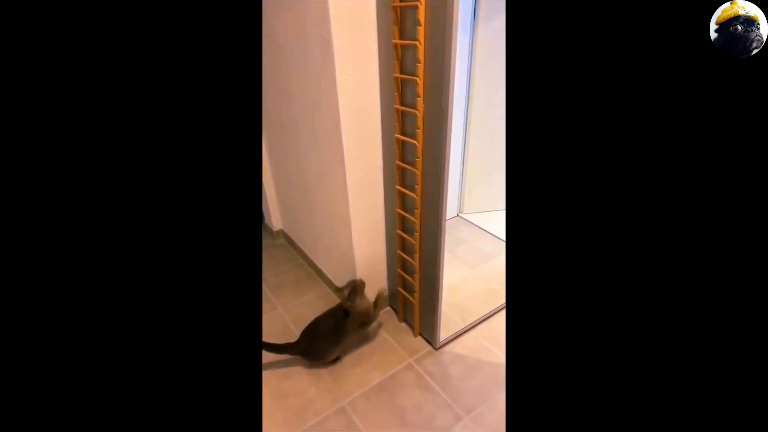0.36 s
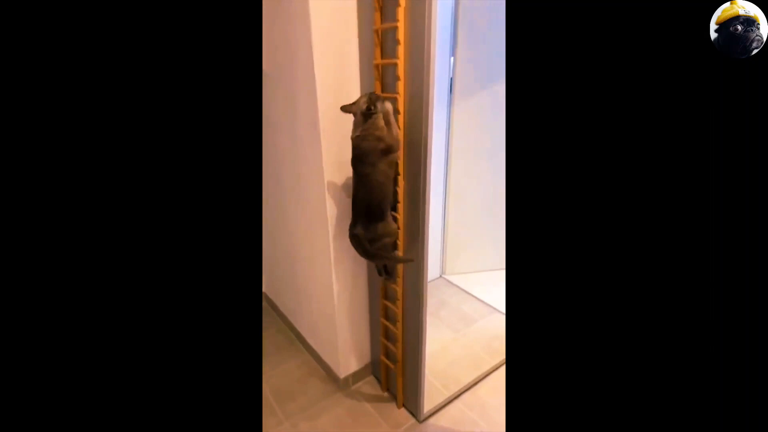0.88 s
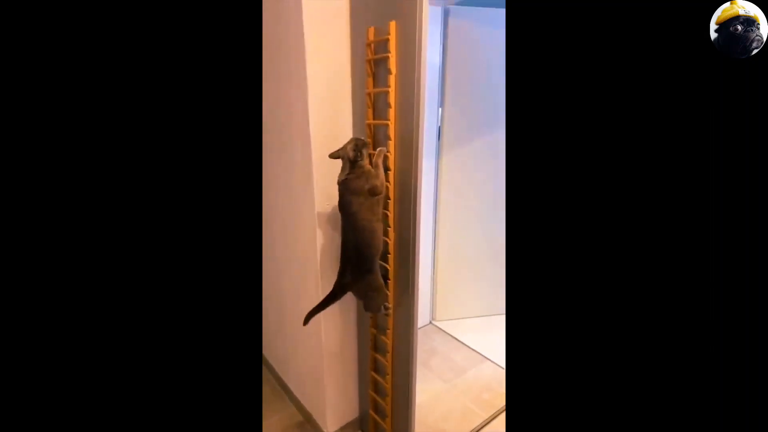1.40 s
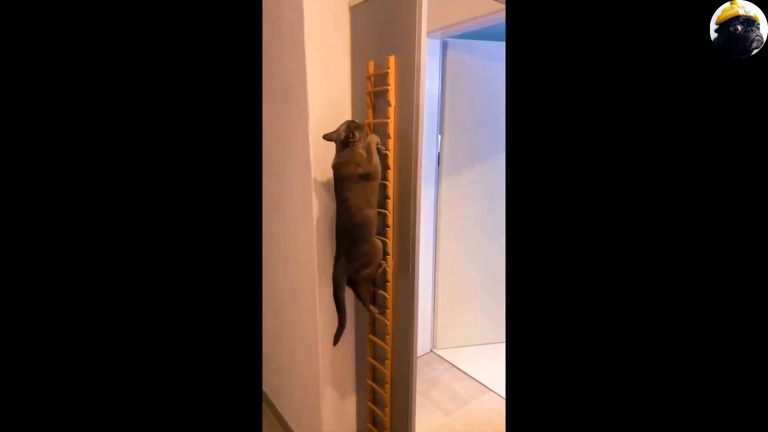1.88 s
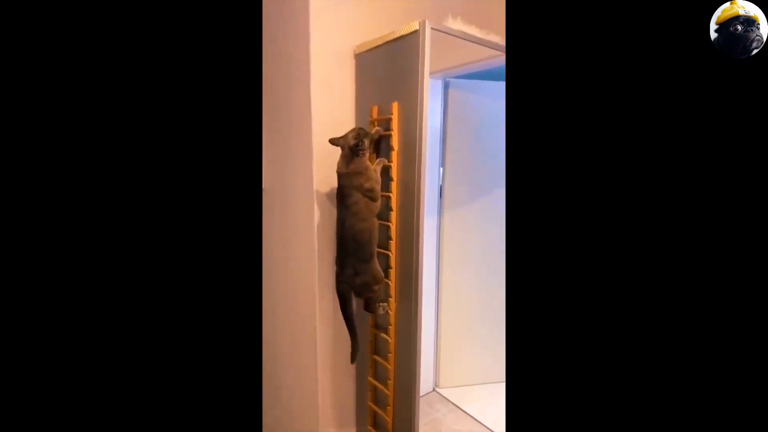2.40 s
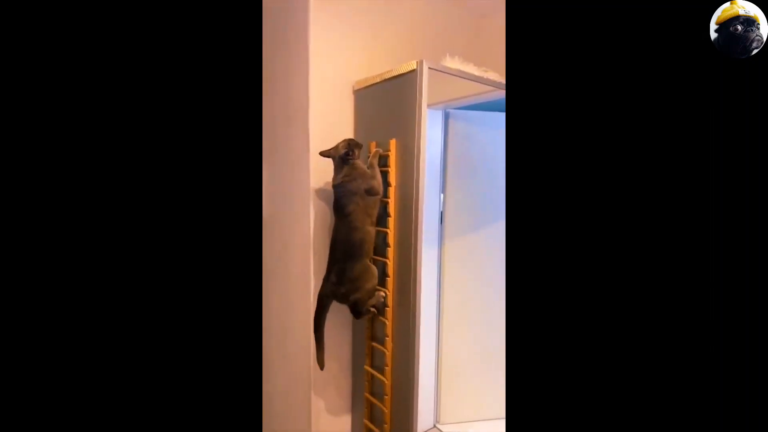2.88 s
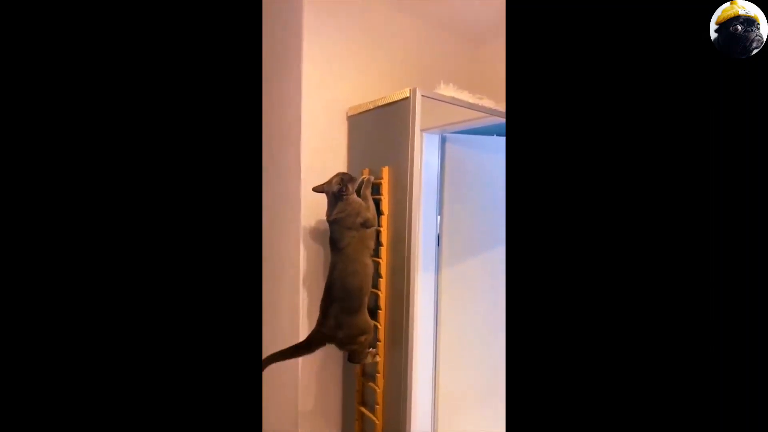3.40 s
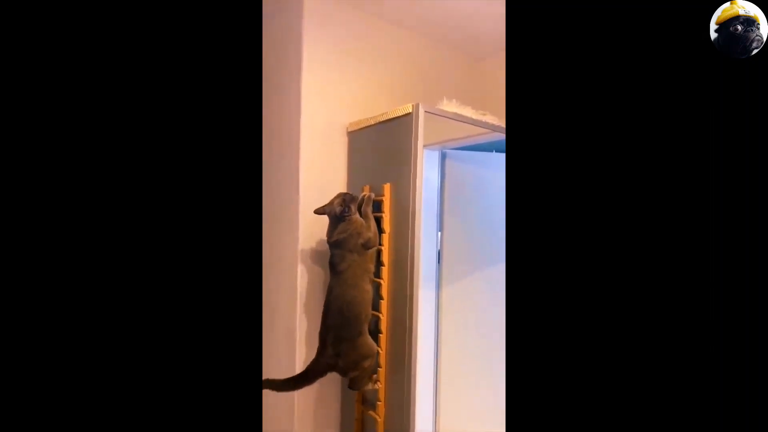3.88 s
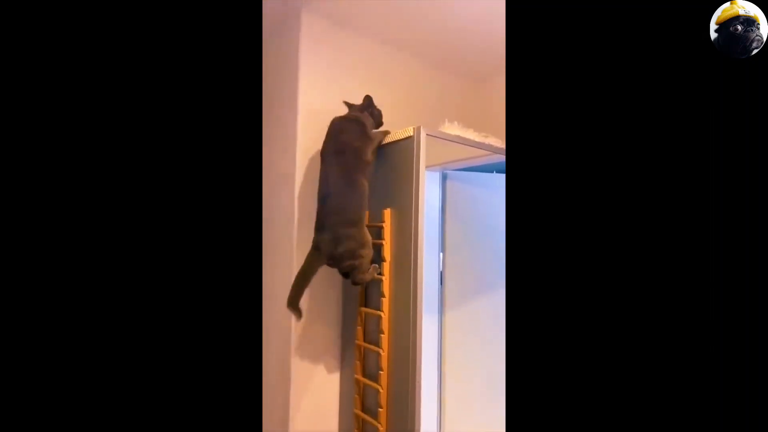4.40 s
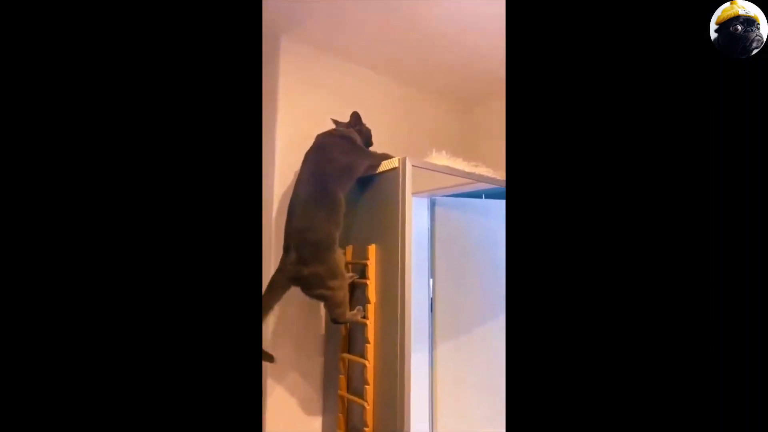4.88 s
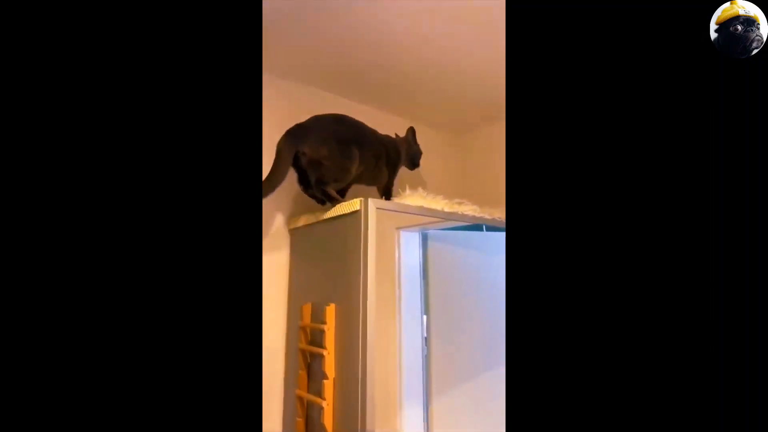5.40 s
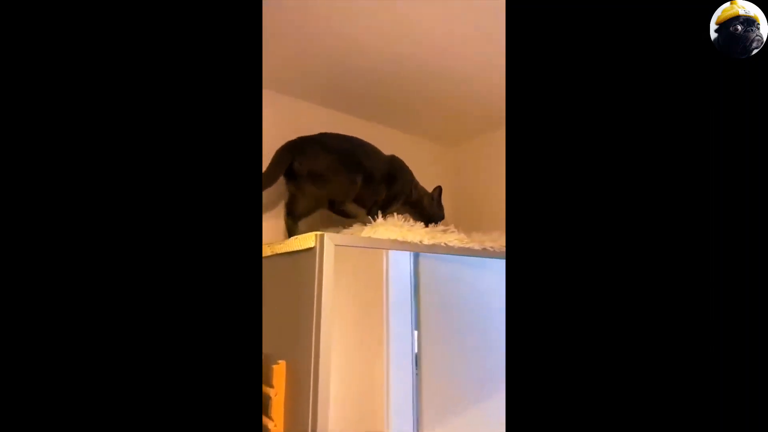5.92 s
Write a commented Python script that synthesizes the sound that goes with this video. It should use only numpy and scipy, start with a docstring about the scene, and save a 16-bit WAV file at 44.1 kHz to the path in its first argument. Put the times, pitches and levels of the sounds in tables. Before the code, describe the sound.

Sharp claw clacks, short scratchy skids and dull hollow knocks climb in uneven clusters, beginning with a loud leap, over faint air noise and low hum.

```python
"""A faint rush of air is heard first: soft noise, strongest in the bass, swelling until 1.7 s, then drifting.
A cat then climbs a wooden ladder fixed to the side of a tall cabinet in a tiled room.
Its claws strike and drag on the rungs: noisy contact forces excite damped modes of the wood.
Its weight thumps the hollow cabinet, exciting panel and air modes; decaying echoes form the room.
A low hum, a sine and its octave, fades in as the microphone tilts up."""
import sys
import numpy as np
from scipy import signal
from scipy.fft import rfft, irfft
from scipy.io import wavfile
from scipy.ndimage import uniform_filter1d

SR = 44100
rng = np.random.default_rng(int(sys.argv[2]) if len(sys.argv) > 2 else 0)


def to_wav(sig):
    """Store sig (one row per channel, or 1-D mono) as 16-bit WAV at the path in sys.argv[1].

    Samples outside -1..1 are clipped; the rate is SR.
    """
    pcm = np.clip(np.atleast_2d(sig), -1, 1) * 32767
    pcm = np.round(pcm).astype(np.int16)
    wavfile.write(sys.argv[1], SR, pcm.T)  # frames by channels


def to_linear_factor(level_db):
    """Convert decibel levels (scalar or array-like) to linear amplitude factors."""
    exponent = np.asarray(level_db, float) / 20
    return 10 ** exponent


N = 265790

# Spectrum of the rush of air: (frequency [Hz], relative density [dB])
AIR_SPECTRUM = [(30, 8), (60, 16), (110, 5), (200, 7), (450, 2), (800, -6), (2000, -8.5), (4000, -13),
                (8000, -20), (15500, -28.5)]
# Strength of the air noise: (time [s], level [dB])
AIR_LEVEL = [(0, -61), (.6, -58.5), (1.7, -49), (3, -53.5), (3.85, -55), (5.7, -54), (6.03, -59.5)]
# Strength of the hum's fundamental: (time [s], level [dB])
HUM_LEVEL = [(0, -87), (1.5, -50.5), (2.6, -56), (3.8, -52), (5, -45.5), (6.03, -51.5)]
# Reverberation time of the room: (frequency [Hz], 60 dB decay time [s])
ROOM_T60 = [(100, 0.64), (400, 0.53), (1500, 0.47), (4000, 0.52), (8000, 0.26), (14000, 0.32)]
# Strength of the echoes: (frequency [Hz], relative level [dB])
ECHO_LEVEL = [(60, -16), (100, -1), (400, -5.5), (1500, -4.5), (4000, -8.5), (8000, -3), (14000, -15.5)]
# Stereo difference before local offsets: (frequency [Hz], side level re mid [dB])
SIDE_LEVEL = [(60, -41), (200, -60), (380, -27), (700, -3), (1300, -19), (2400, -11.5), (4400, -4),
              (8000, -7), (12000, -19.5), (15500, -3.5)]
# Cabinet panel modes: (frequency [Hz], relative level [dB], 60 dB decay time [s])
PANEL_MODES = [(183, -13.5, 0.14), (215, -21, .12), (256, -5.5, 0.27), (312, 3, 0.04), (401, 8.5, 0.031),
               (414, -11, 0.07), (457, -10, 0.024), (509, -3, 0.051)]
# Modes of the air in the cabinet: (frequency [Hz], relative level [dB], 60 dB decay time [s])
CAVITY_MODES = [(54, -18, 0.16), (75, 9, 0.17), (105, 11.5, 0.079), (120, 24.5, 0.35), (140, -20.5, .25)]
# Ladder rail modes: (frequency [Hz], relative level [dB], 60 dB decay time [s])
RAIL_MODES = [(520, 0, .04), (600, -3, .04), (730, -4, .03), (890, -3, .03), (1100, -2, .03),
              (1190, 0, .05), (1400, -2, .03)]
# Ladder rung modes: (frequency [Hz], relative level [dB], 60 dB decay time [s])
RUNG_MODES = [(1630, -4, .025), (1880, -4, .025), (2090, -2, .025), (2300, 0, .025), (2530, 0, .025),
              (2760, 0, .025), (3050, -2, .025), (3250, -3, .02), (3500, -2, .02), (3800, -4, .02),
              (4200, -4, .02), (4600, -5, .015), (5000, -5, .015), (5900, -6, .012)]
# Weight landing on the cabinet:
# (time [s], ring level [dB], ring centre [Hz], deep part re ring [dB], deep centre [Hz])
THUMPS = [(0.653, -27, 180, -8, 76), (0.711, -18, 549, -24.5, 72), (0.77, -20, 500, -28.5, 118),
          (0.797, -7.5, 190, -35, 116.3), (0.893, -6.5, 183, -6.5, 103.3), (0.926, -19.5, 365, -4, 105.3),
          (1.125, -52, 360, -5, 86.1), (1.277, -28.5, 297.6, -2.5, 96), (1.337, -35.5, 294, -16.5, 106),
          (1.411, -45, 320, 12, 114), (1.494, -28, 248, -9, 107), (1.729, -30, 252, -19.5, 117.2),
          (1.888, -32.5, 307.6, 0, 89.5), (2.183, -26.5, 252, -13, 116.4), (2.206, -32.5, 258, 1.5, 101.5),
          (2.371, -31.5, 560, -26.5, 98), (2.638, -23, 252, -13.5, 105), (2.839, -33.5, 387, -5, 65),
          (3.046, -26.5, 256, -21, 121), (3.091, -22, 322, -25, 121), (3.149, -30, 323, -25, 119),
          (3.193, -30.5, 405.5, -13, 99), (3.471, -27, 323, -11, 120), (3.655, -34.5, 269.8, -31, 120.5),
          (3.999, -35, 296, 3.5, 109), (4.104, -21.5, 421, -32.5, 110), (4.209, -21.5, 386.4, -10.5, 70.0),
          (4.349, -33, 429, 4, 75), (4.466, -22.5, 274, -6, 115.4), (4.654, -11.5, 300, -3, 102.7),
          (4.68, -20.5, 149, 11, 70.4), (4.862, -28.5, 370, -36.5, 117.5), (5.007, -26.5, 263, -13, 123),
          (5.225, -31.5, 505.6, -18, 120), (5.28, -28.5, 336, -31, 121), (5.333, -28, 321.3, -5, 70.9),
          (5.458, -26.5, 345, 0, 84.4)]
# Claws dragging over wood: (time [s], ring level [dB], ring centre [Hz], hiss re ring [dB])
DRAGS = [(0.7813, -16, 2300, -55), (0.8385, -28, 2610, 8), (0.915, -22.5, 2500, 5.5),
         (0.9707, -26, 2277, 20), (0.9872, -16.5, 2420, -15), (1.002, -31, 1190, 6),
         (1.0244, -32.5, 2670, -4), (1.326, -48.5, 2070, -8), (1.4918, -25.5, 4160, -1.5),
         (1.5245, -29, 2820, 3.5), (1.746, -31, 2870, 1.5), (1.93, -37.5, 2970, 4.5),
         (1.985, -39, 1270, -15.5), (2.165, -21.5, 2430, -6.5), (2.2076, -27, 1950, -24),
         (2.242, -35, 2620, -6), (2.4656, -29.5, 2588, 11), (2.846, -45, 2100, -4),
         (3.0686, -34, 1890, 7.5), (3.091, -32, 2370, -18), (3.1086, -33, 2570, 1),
         (3.147, -25.5, 2870, -13), (3.191, -28, 2720, -13), (3.4142, -38.5, 3020, -44),
         (3.993, -41, 3030, -3), (4.2505, -36.5, 2424, 2), (4.351, -24.5, 2630, 5),
         (4.4825, -28.5, 2860, 5.5), (4.663, -35, 2690, -9.5), (4.846, -25.5, 3000, 1),
         (5.01, -27, 3400, 3), (5.0744, -24, 2670, 4.5), (5.3529, -31.5, 2870, 9.5),
         (5.8232, -62.5, 3600, 14), (5.9153, -72, 3710, 21.5)]
# Claws hitting rungs:
# (time [s], ring level [dB], ring centre [Hz], treble crack re ring [dB], low knock re ring [dB])
CLAWS = [(0.644, -33, 1510, -4.5, -5.5), (0.6505, -21, 2340, -2, -25.5), (0.7127, -23.5, 2193, 0.5, -8),
         (0.7209, -22, 2446, -15.5, -17.5), (0.7682, -27.5, 2310, 0.5, -14.5),
         (0.7936, -5.5, 2460, 1, -16.5), (0.874, -25, 2010, 3, 3), (0.926, -14, 2480, 8, -0.5),
         (0.9431, -10.5, 2500, -2, -17.5), (1.123, -21.5, 4540, 5, -21.5), (1.131, -19.5, 3040, -3, -18),
         (1.2786, -33, 1616, -18, -1.5), (1.406, -24, 1320, -33, -13), (1.415, -18, 2600, -4.5, -6),
         (1.734, -16.5, 3100, -16, -13), (1.877, -27.5, 2470, -18.5, -5), (1.9152, -32, 2920, -3, -0.5),
         (1.9828, -35.5, 2500, -19.5, -1), (2.1094, -36, 2710, -22, 0), (2.151, -19, 2370, -14, -19),
         (2.158, -23, 4800, 1.5, -9.5), (2.373, -14, 2966, -22.5, -33), (2.425, -11.5, 2340, -13, -35),
         (2.427, -12, 4250, -11, -26), (2.632, -28.5, 2525, -14.5, -9), (2.7025, -31.5, 2510, -16.5, -3.5),
         (2.963, -47.5, 2565, -12, 3), (3.039, -20, 2650, -13.5, -8), (3.186, -17.5, 2910, -4, -16),
         (3.4071, -34, 2940, -45, -25), (3.479, -30.5, 2520, -13.5, -13), (3.541, -26, 2550, -2.5, -28),
         (3.6869, -47, 1880, -0.5, 6.5), (3.705, -35.5, 3080, -17, -7.5), (3.9581, -43, 2025, -8.5, -7),
         (3.9861, -35.5, 3220, 2, -3.5), (4.1096, -22, 1860, -29.5, -7.5),
         (4.2098, -19.5, 2890, -31, -16.5), (4.321, -19, 2415, -1.5, -22), (4.358, -9.5, 2810, -9, -28),
         (4.4504, -16.5, 3730, 5, -11.5), (4.6153, -46.5, 3000, 14.5, 8.5), (4.653, -16.5, 2220, 2, -1.5),
         (4.729, -21.5, 4400, -4, -34), (4.824, -29, 2590, -0.5, -9), (4.864, -9, 3670, 3, -20),
         (4.999, -15.5, 3216, 1, -30), (5.225, -28.5, 2560, -11.5, 0), (5.283, -21.5, 2320, -44.5, -35),
         (5.3291, -15.5, 3240, 5, -55)]

HUM_HZ, HUM_OCTAVE_DB = 142.8, -24   # octave relative to the fundamental
PRESS_S, PUSH_S, HEAVE_S = 0.0042, 0.012, 0.013   # push build-up, push fade, slower swell of inner air
SKID_S = 0.0095   # time for a skid to swell to its peak
LEAD_S = 0.02   # room for the scuff ahead of a strike
SCUFF_S, SCUFF_SHARE, BITE_S = 0.0015, 0.6, 0.01   # scuff rise, its share of the force, fade of the bite
LOW_CUT_HZ = 44
TINY = 1e-18   # keeps forces off exact zero


def at_hz(points, hz):
    """Interpolation on a logarithmic frequency axis."""
    table = np.array(points)
    return np.interp(np.log(np.maximum(hz, 1)), np.log(table[:, 0]), table[:, 1])


def in_time(rows):
    """Linear interpolation of a curve at every sample."""
    return np.interp(np.arange(N) / SR, *np.transpose(rows))


def coloured(x, spectrum):
    """Linear filtering: each frequency is weighted by the spectrum."""
    hz = np.fft.rfftfreq(x.shape[-1], 1 / SR)
    return irfft(rfft(x) * to_linear_factor(at_hz(spectrum, hz)), x.shape[-1])


def peak_one(x):
    """Normalisation: the loudest 3 ms get the mean power of a unit sine."""
    return x / np.sqrt(2 * uniform_filter1d(x ** 2, size=132).max())


def add(track, s, sound):
    """Superposition: a sound joins the track at time s."""
    i = round(s * SR)
    track[i:i + len(sound)] += sound[:len(track) - i]


def ringing(force, modes, centre_hz, octaves, spread_db, detune):
    """Modal superposition: a force drives damped resonators, favouring those near a centre; peak 1."""
    out = 0
    # mode strengths and pitches differ from spot to spot
    luck = rng.standard_normal((len(modes), 2))
    for (hz, level_db, t60), (chance, shift) in zip(modes, luck):
        r = to_linear_factor(-60 / (max(t60, 0.005) * SR))
        w = 2 * np.pi * hz * (1 + detune * shift) / SR
        near_db = -12 * min((np.log2(hz / centre_hz) / octaves) ** 2, 1.2)
        gain = to_linear_factor(level_db + near_db + spread_db * chance)
        out = out + signal.lfilter([0, gain * np.sin(w)], [1, -2 * r * np.cos(w), r * r], force)
    return peak_one(out)


def broad(force, hz, q):
    """Heavily damped resonance: the bulk of the wood responds widely, falling steeper above; peak 1."""
    dulled = signal.sosfilt(signal.butter(2, 2 * hz, fs=SR, output="sos"), force)
    return peak_one(signal.lfilter(*signal.iirpeak(hz, q, fs=SR), dulled))


def hiss(force):
    """Direct radiation of a contact: the treble of the force itself, falling with pitch; peak 1."""
    treble = signal.sosfilt(signal.butter(2, 3500, "high", fs=SR, output="sos"), force)
    return peak_one(signal.sosfilt(signal.butter(1, 4500, fs=SR, output="sos"), treble))


def chatter(size, grain_db):
    """Rough contact: a dense random train of clicks, made more uneven by grain_db."""
    grains = np.minimum(rng.exponential(1, size), 4)
    return rng.standard_normal(size) * to_linear_factor(grain_db * grains)


def air():
    """Broadband random noise: coloured mid and side signals share a level that swells, then drifts."""
    mid, side = coloured(rng.standard_normal((2, N)), AIR_SPECTRUM)
    side = coloured(side, SIDE_LEVEL)
    return to_linear_factor(in_time(AIR_LEVEL)) * np.array([mid + side, mid - side]) / np.std(mid)


def hum():
    """Harmonic oscillation: a motor tone of steady pitch with a weak octave and a varying level."""
    phase = 2 * np.pi * HUM_HZ * np.arange(N) / SR
    tone = np.sin(phase) + to_linear_factor(HUM_OCTAVE_DB) * np.sin(2 * phase)
    return np.sqrt(2) * to_linear_factor(in_time(HUM_LEVEL)) * tone   # root two: the table gives rms


def room(x):
    """Reverberation: convolution with dense echoes that decay exponentially, band by band."""
    t = np.arange(24576) / SR
    edges = 45 * 2 ** np.arange(0, 8.6, 0.5)   # half-octave bands
    tail = np.zeros((2, len(t)))   # mid, side
    white = rng.standard_normal((2, 2, len(t)))
    build = 1 - np.exp(-t / 0.0055)   # echoes thicken over the first ms
    prompt = np.exp(-t / 0.0019)
    for k, (low, high) in enumerate(zip(edges, edges[1:])):
        hz = np.sqrt(low * high)
        side_db = at_hz(SIDE_LEVEL, hz)
        band = signal.sosfilt(signal.butter(2, [low, high], "band", fs=SR, output="sos"), white[k % 2])
        t60 = at_hz(ROOM_T60, hz) * np.array([[1], [0.7]])   # side echoes come mostly early
        decay = build * to_linear_factor(-60 * t / t60)
        gains = to_linear_factor(at_hz(ECHO_LEVEL, hz) + np.array([[0], [side_db + 3]]))
        tail += gains * band * decay / np.sqrt(np.sum(decay ** 2, axis=1, keepdims=True))
        # the two microphone ports hear the direct sound a little differently
        tail[1] += to_linear_factor(side_db + 1) * band[0] * prompt / np.sqrt(np.sum(prompt ** 2))
    mid, side = signal.fftconvolve(x[None], tail, axes=1)[:, :N]
    return np.array([x + mid + side, x + mid - side])


def thumps():
    """Forced vibration: a soft uneven push rings the panels; the air inside swells later and lasts longer."""
    out, t = np.zeros(N), np.arange(24576) / SR
    push = (1 - np.exp(-t / PRESS_S)) * np.exp(-t / PUSH_S)
    swell = t / HEAVE_S
    for s, level_db, hz, deep_db, deep_hz in THUMPS:
        force = rng.standard_normal(len(t)) * push + TINY
        heave = swell * np.exp(-swell) * np.sin(2 * np.pi * deep_hz * t)
        panels = ringing(force, PANEL_MODES, hz, octaves=0.12, spread_db=5.5, detune=0.03)
        panels = panels + to_linear_factor(-8) * broad(force, hz, q=4.5)
        deep = ringing(heave, CAVITY_MODES, deep_hz, octaves=0.29, spread_db=8.5, detune=0.024)
        add(out, s, to_linear_factor(level_db) * (panels + to_linear_factor(deep_db) * deep))
    return out


def drags():
    """Sliding friction: a skid's rough force swells and fades over tens of ms, in uneven slips."""
    out, swell = np.zeros(N), np.arange(8192) / SR / SKID_S
    for s, level_db, hz, hiss_db in DRAGS:
        slips = to_linear_factor(3.3 * np.repeat(rng.standard_normal(64), 128))   # a new strength every 3 ms
        force = chatter(len(swell), grain_db=3.5) * slips * swell * np.exp(-swell) + TINY
        wood = ringing(force, RAIL_MODES + RUNG_MODES, hz, octaves=0.2, spread_db=4.5, detune=0.028)
        wood = wood + to_linear_factor(6.5) * broad(force, hz, q=0.82)
        add(out, s, to_linear_factor(level_db) * (wood + to_linear_factor(hiss_db) * hiss(force)))
    return out


def claws():
    """Impact excitation: a claw scuffs in, bites and chatters; rung, rail and bright crack sound together."""
    out, t = np.zeros(N), np.arange(4096) / SR - LEAD_S
    shape = np.where(t < 0, SCUFF_SHARE * np.exp(t / SCUFF_S), np.exp(-t / BITE_S))
    for s, level_db, hz, crack_db, knock_db in CLAWS:
        rattle = to_linear_factor(2 * np.repeat(rng.standard_normal(64), 64))   # contact strength varies in short steps
        force = chatter(len(t), grain_db=0) * rattle * shape + TINY
        rung = ringing(force, RUNG_MODES, hz, octaves=0.18, spread_db=5.5, detune=0.033)
        rung = rung + to_linear_factor(-4.5) * broad(force, hz, q=1.47)
        crack = to_linear_factor(crack_db) * hiss(force)
        rail = ringing(force, RAIL_MODES, 1400, octaves=1.8, spread_db=8.5, detune=0.022)
        knock = to_linear_factor(knock_db) * (rail + broad(force, 800, q=0.18))
        add(out, s - LEAD_S, to_linear_factor(level_db) * (rung + crack + knock))
    return out


def scene():
    """Superposition: contacts and thumps sound in the room, over air and hum."""
    return room(claws() + drags() + thumps()) + air() + hum()


def band_limit(x):
    """A steep low-pass at the top of the band."""
    return signal.sosfilt(signal.butter(12, 15790, fs=SR, output="sos"), x)


def record(dry):
    """Band limiting and saturation: deep bass is removed, peaks are rounded, top treble is cut."""
    heard = signal.sosfilt(signal.butter(4, LOW_CUT_HZ, "high", fs=SR, output="sos"), dry)
    rounded = 1.2 * np.tanh(heard / 1.2)
    mix = signal.sosfilt(signal.cheby2(12, 50, 15900, fs=SR, output="sos"), rounded)
    return band_limit(mix)


dry = scene()
out = record(dry)
to_wav(out)
```